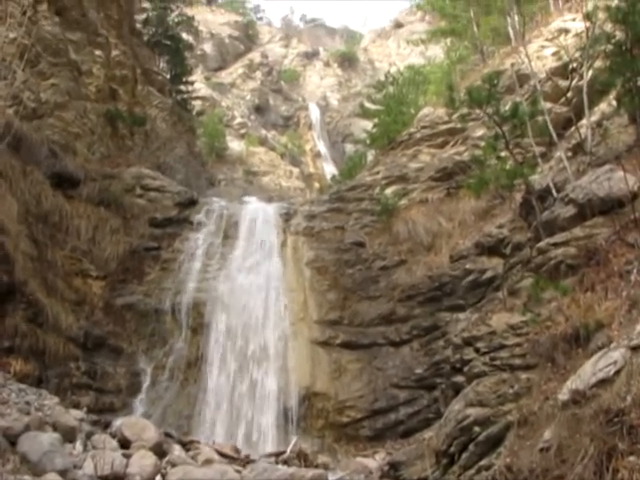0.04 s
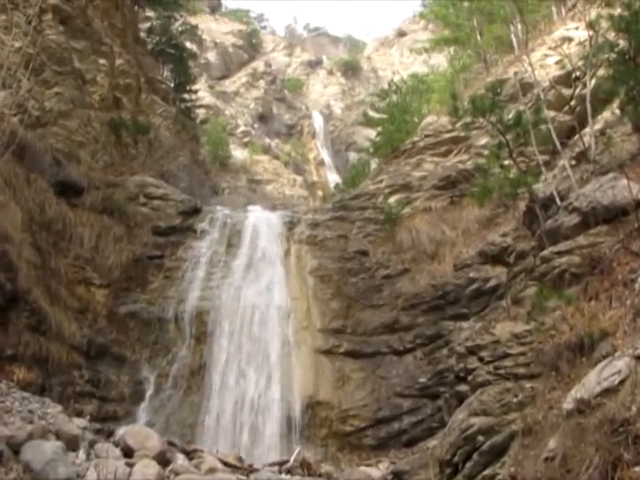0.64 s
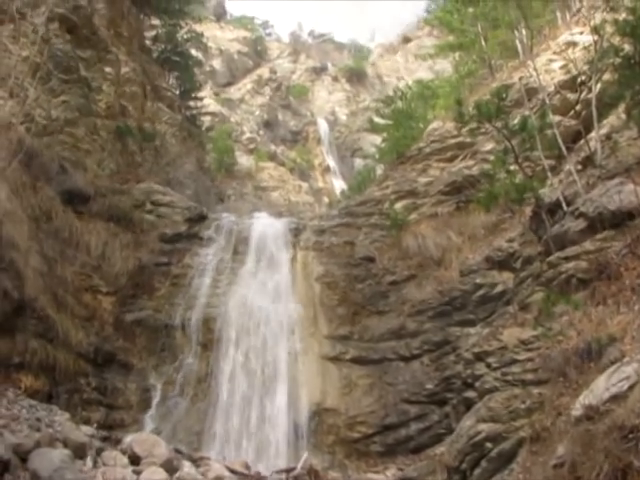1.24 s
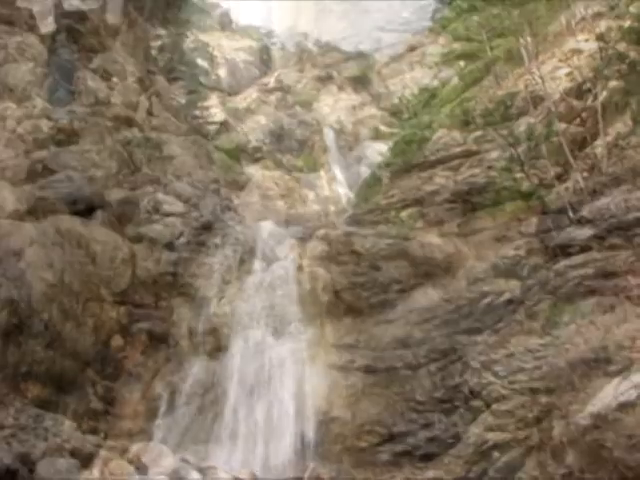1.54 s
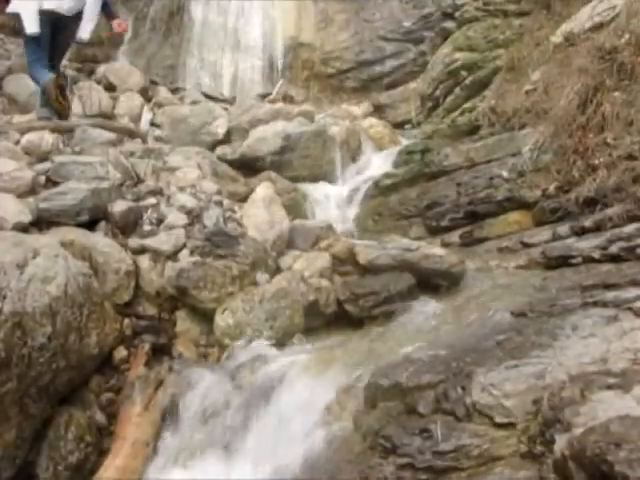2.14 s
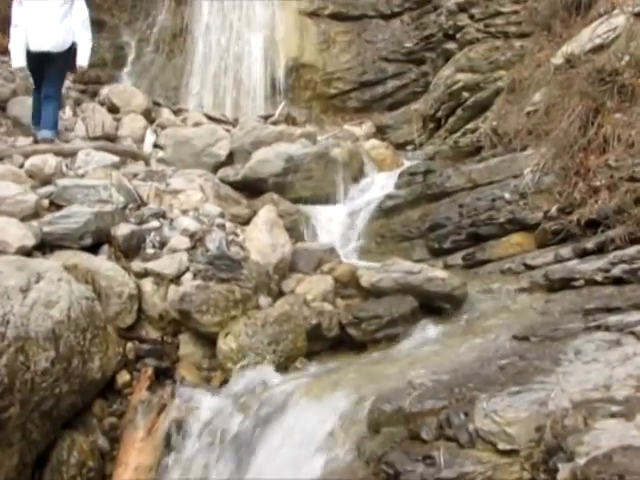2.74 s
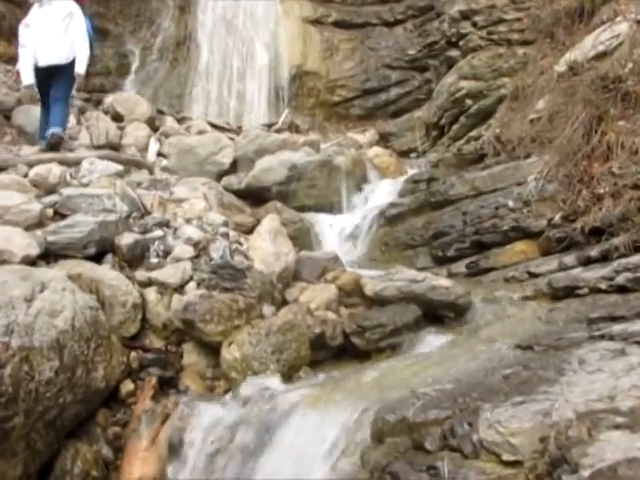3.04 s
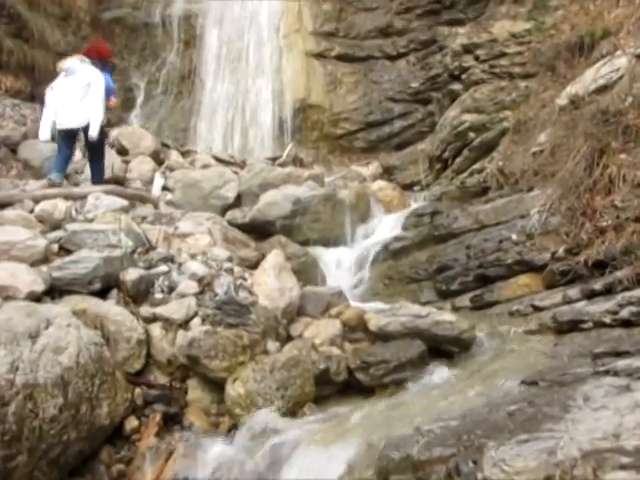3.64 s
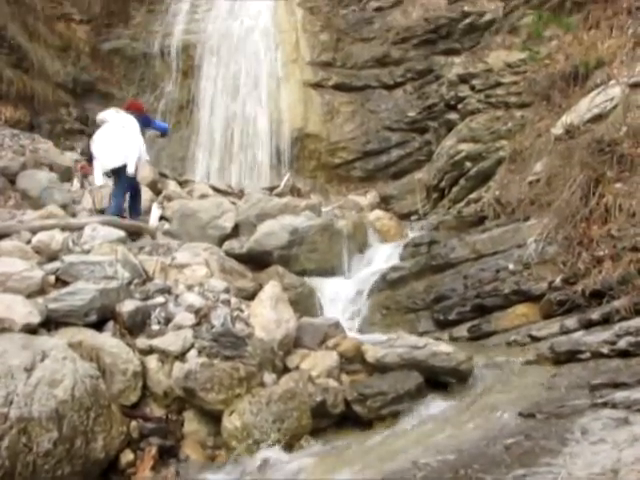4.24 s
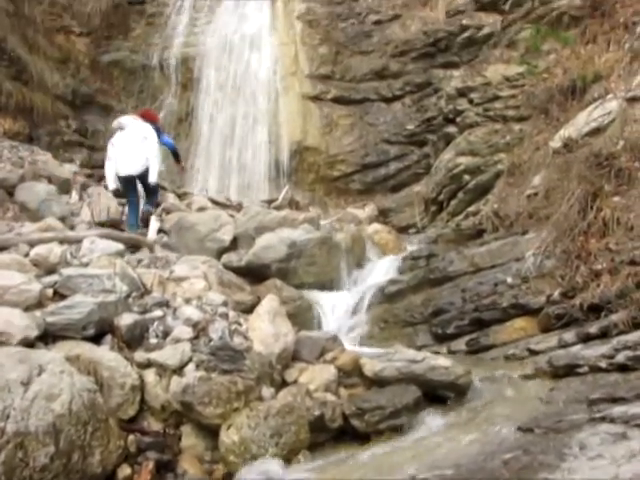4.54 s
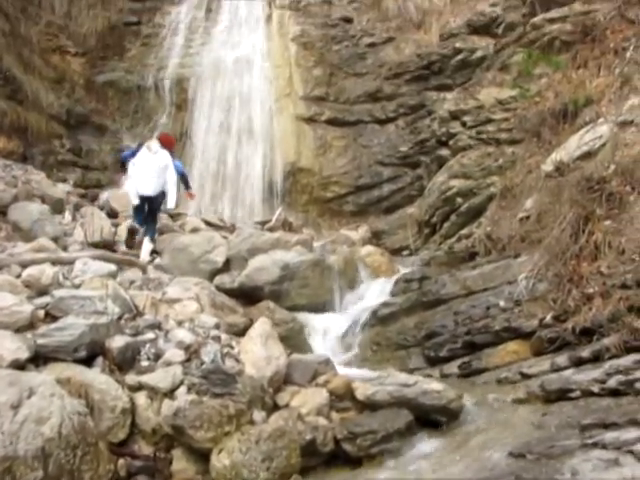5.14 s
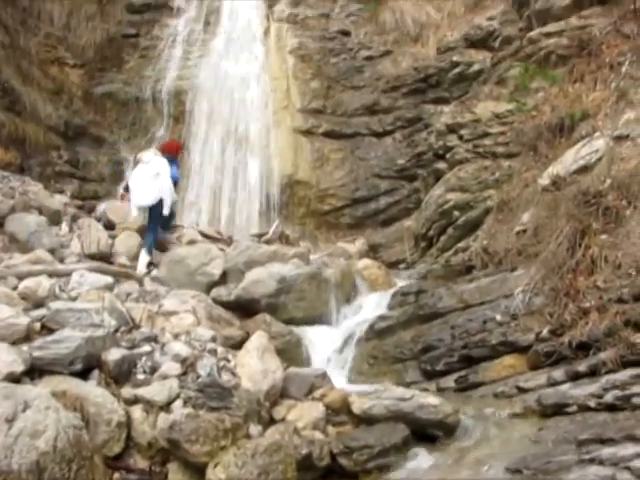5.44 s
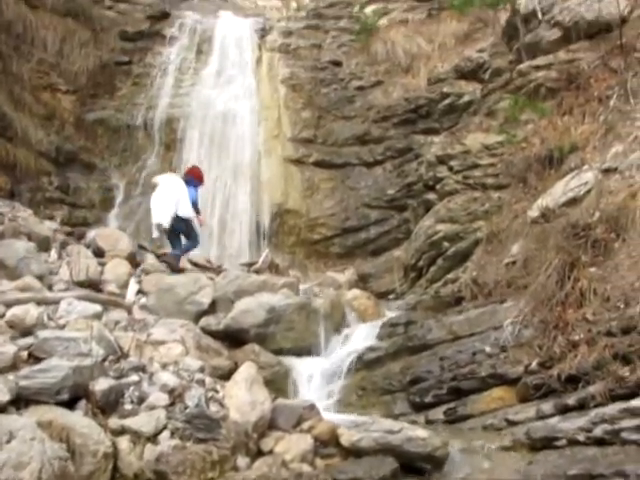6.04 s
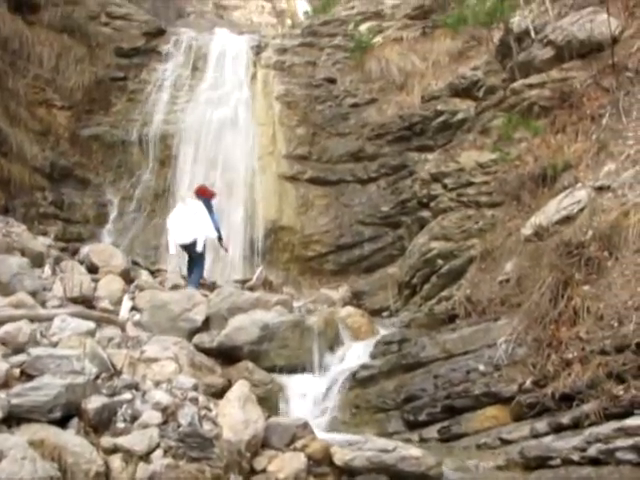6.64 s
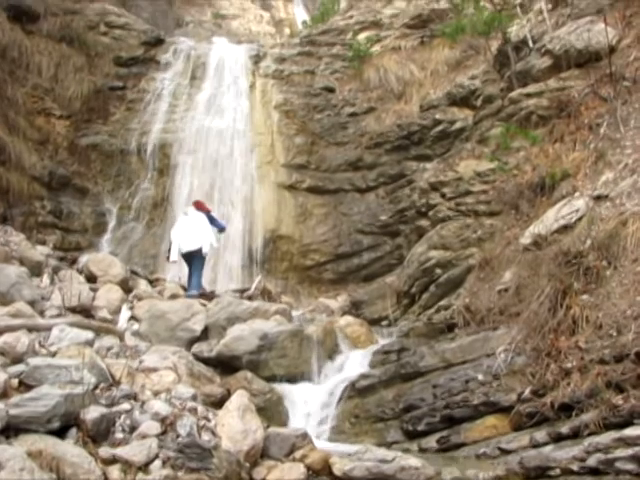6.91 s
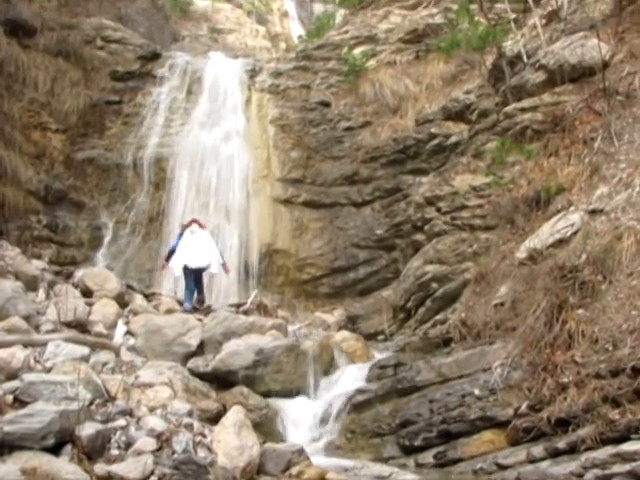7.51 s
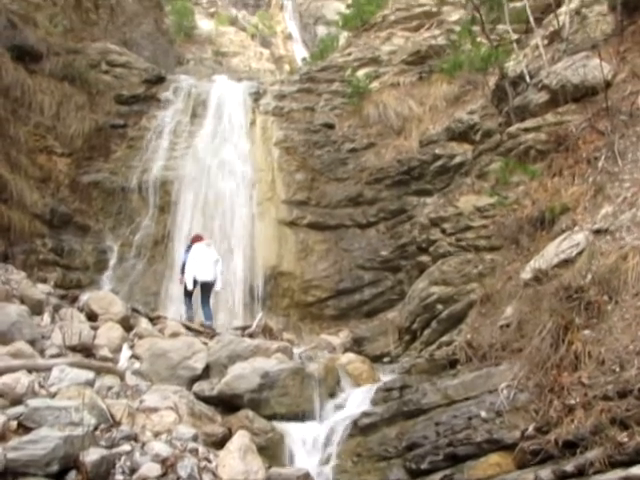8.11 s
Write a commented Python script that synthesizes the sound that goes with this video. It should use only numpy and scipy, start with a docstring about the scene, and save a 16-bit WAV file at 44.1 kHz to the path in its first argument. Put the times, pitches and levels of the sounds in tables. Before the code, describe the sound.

A tall waterfall pours onto rocks in a gorge, a steady, full rush of churning foam and spattering drops. After a second or so the sound blends smoothly into a spot beside the stream below, slightly quieter and more burbling. Gentle gushes swell, faint low blips and small close splashes poke through, and the level dips briefly now and then. The small microphone sounds dull on top.

```python
"""Waterfall in a gorge

A tall fall pours onto rocks. We start facing it, then fade to a spot beside the stream below.
Churning foam roars, countless drops slap the stones and trapped air bubbles ring, all coloured by the
rock walls. Gushes swell, a few low blips and nearby splashes stand out, and now and then the level
dips briefly. The small microphone is dull on top."""
import sys
import numpy as np
from scipy import signal
from scipy.fft import rfft, irfft
from scipy.io import wavfile

SR = 44100
rng = np.random.default_rng(int(sys.argv[2]) if len(sys.argv) > 2 else 0)


def materialize(psi):
    """Save the field psi as 16-bit PCM at rate SR to the path in sys.argv[1].

    A 1-D psi becomes a single channel; in a 2-D psi each row is a channel.
    """
    bounded = np.clip(np.atleast_2d(psi).T, -1, 1)
    quanta = np.round(bounded * 32767).astype(np.int16)
    wavfile.write(sys.argv[1], SR, quanta)


N = 364707
TIME = np.arange(N) / SR
FREQ = np.maximum(np.arange(N // 2 + 1) * SR / N, 1)

# Tone of the water, microphone facing the fall. Each row: frequency in Hz, relative level in dB.
FALL_SPECTRUM = [(15, -39.5), (25, -29), (54, -20), (92, -14.5), (219, -3.5), (311, -1.5), (488, -1.5),
                 (745, -2), (1080, -4), (1500, -6), (2070, -7), (2410, -8.5), (4280, -15.5), (6870, -32),
                 (9750, -62.5), (12700, -100), (21400, -120)]
# Tone of the water, microphone beside the stream. Each row: frequency in Hz, relative level in dB.
STREAM_SPECTRUM = [(15, -40.5), (25, -24.5), (54, -19.5), (143, -8), (289, 0), (430, 0), (526, -0.5),
                   (888, -3), (1290, -5.5), (2180, -9.5), (2730, -9), (3780, -10.5), (5490, -21),
                   (7410, -35), (9750, -61), (12700, -98), (21400, -120)]
# Bands the rock walls lift or cancel, facing the fall. Each row: centre in Hz, width in Hz, lift in dB.
FALL_WALL_BANDS = [(64, 18, 5), (180, 30, 1), (225, 20, 3.5), (248, 22, -3.5), (723, 140, 1.5),
                   (930, 260, -1), (1440, 300, 2.5), (2440, 520, -2.5), (3780, 900, 1.5)]
# The same beside the stream. Each row: centre in Hz, width in Hz, lift in dB.
STREAM_WALL_BANDS = [(64, 11, 8), (98, 16, 1), (193, 43, 3), (250, 47, -2), (313, 44, 0.5), (387, 99, -3),
                     (706, 180, 1), (935, 260, -2), (1320, 680, 2.5), (2150, 210, -1.5), (2580, 980, 2.5),
                     (3700, 700, 0.5)]
# Gushes between the rocks. Each row: peak time in seconds, length in seconds, lift in dB, centre in Hz.
ROCK_GUSHES = [(0.65, 0.17, 1.5, 677), (1.133, 0.08, 1, 850), (1.33, 0.2, 1.1, 900), (2.098, 1, 0.5, 2510),
               (2.095, 0.35, 3, 620), (2.314, 0.074, 2, 620), (3.135, 0.064, 2.5, 900),
               (3.95, 0.07, 1.5, 954), (4.28, 0.089, 0.8, 950), (5.134, 0.22, 2.1, 940),
               (5.43, 0.09, -0.1, 900), (5.783, 0.055, 1.5, 750), (5.964, 0.12, 2.1, 700),
               (6.409, 0.087, 2.5, 700), (6.608, 0.17, 2.5, 800), (7.118, 0.19, 1.3, 680),
               (7.65, 0.33, 1.9, 423), (8.073, 0.16, 2.2, 420)]
# Brief low pitched blips. Each row: start in seconds, relative level in dB, starting pitch in Hz.
LOW_BLIPS = [(0.325, -19, 312), (0.59, -16.5, 742), (0.897, -17, 510), (1.27, -23, 240), (2.598, -21, 590),
             (2.869, -19, 614), (3.511, -15, 790), (5.269, -22.5, 304), (6.39, -21, 544), (6.504, -16, 720),
             (6.769, -17.5, 640), (6.984, -16.5, 650), (7.559, -18, 395)]
# Water slapping a stone near the microphone. Each row: start in seconds, level in dB, centre in Hz.
NEAR_SPLASHES = [(0.597, -32, 3000), (2.435, -40, 4800), (2.739, -32, 4500), (2.966, -38, 4970),
                 (3.099, -34, 5000), (3.284, -28, 2800), (3.423, -37, 4800), (4.633, -29, 2800),
                 (4.826, -38, 4800), (4.888, -28.5, 2800), (5.464, -34, 3800), (5.648, -32, 2800),
                 (5.843, -42, 4800), (7.01, -33, 2800)]
# Brief dips in the whole sound. Each row: start in seconds, depth in dB.
LEVEL_DIPS = [(2.36, 2.5), (2.455, 1.5), (2.62, 1.8), (2.758, 3.6), (3.312, 6), (3.77, 2.3), (3.865, 3),
              (5.495, 2.5), (6.095, 0.8), (6.265, 2.2)]


def foam(flicker_db, flicker_per_s):
    """Churning white water roars: octave bands of turbulence that each flicker on their own."""
    noise, out = rfft(rng.standard_normal(N)), 0
    octave = np.log2(np.clip(FREQ / 80, 1, 128))  # octaves above 80 Hz
    for band in np.arange(np.ceil(octave.max()) + 1):
        share = np.maximum(1 - np.abs(octave - band), 0)
        out = out + irfft(noise * share, N) * undb(flicker_db * wander(flicker_per_s))
    return unit(out)


def drops(per_s, spread_db, clump_db, clumps_per_s):
    """Drops slap the stones as tiny uneven clicks, arriving in clumps as the sheet of water tears."""
    chance = per_s / SR * undb(clump_db * wander(clumps_per_s))
    lands = rng.random(N) < chance
    size = undb(spread_db * rng.uniform(-1.2, 1, N))
    polarity = np.sign(rng.standard_normal(N))
    return unit(lands * size * polarity)


def bubble(hz, cycles, rise):
    """A tone that rings for a few cycles and climbs in pitch, as trapped air does near the surface."""
    decay_s = cycles / hz
    t = np.arange(min(int(5 * decay_s * SR), SR)) / SR
    phase = 2 * np.pi * hz * t * (1 + rise * t / decay_s / 2)
    return np.sin(phase) * np.exp(-t / decay_s)


def bubbles(low_hz, high_hz, cycles, rise, spread_db, count):
    """A crowd of bubbles of all sizes rings in the churned water."""
    out = np.zeros(N)
    for when, pitch, size, life in rng.random((count, 4)):
        hz = low_hz * (high_hz / low_hz) ** pitch
        # small bubbles die sooner and start with a sharper peak
        ring = bubble(hz, cycles * (.5 + life), rise) * hz
        add(out, when * N / SR, ring * undb(spread_db * size))
    return unit(out)


def gushes(water, octaves, lull_db):
    """Each gush swells its own band of the rush; between them the middle sinks back a little."""
    spectrum = rfft(water)
    middle = irfft(spectrum * bell(680, octaves), N)
    out = water + (undb(lull_db) - 1) * middle
    for peak_s, length_s, lift_db, centre_hz in ROCK_GUSHES:
        swell = undb(lift_db * hump(TIME - peak_s, length_s))
        out = out + (swell - 1) * irfft(spectrum * bell(centre_hz, octaves), N)
    return out


def spray(water, centre_hz, octaves, flicker_db, flicker_per_s):
    """Fine spray lands in quick flurries, so the bright edge of the rush flickers."""
    bright_edge = irfft(rfft(water) * bell(centre_hz, octaves), N)
    flurries = unit(undb(flicker_db * wander(flicker_per_s)))
    return water + (flurries - 1) * bright_edge


def low_blips(cycles, rise, gain_db):
    """Brief low pitched blips that stand out of the rush."""
    out = np.zeros(N)
    for start_s, db, hz in LOW_BLIPS:
        add(out, start_s, undb(db + gain_db) * bubble(hz, cycles, rise))
    return out


def splashes(rise_s, octaves):
    """Water slaps stones near the microphone: short bursts of drops, each with its own brightness."""
    patter = drops(per_s=5300, spread_db=-1.5, clump_db=3.0, clumps_per_s=39)
    spectrum = rfft(gorge(patter, STREAM_SPECTRUM, STREAM_WALL_BANDS))
    out = 0
    for start_s, db, centre_hz in NEAR_SPLASHES:
        age = np.maximum(TIME - start_s, 0) / rise_s
        burst = unit(irfft(spectrum * bell(centre_hz, octaves), N))
        out = out + undb(db) * age * np.exp(1 - age) * burst
    return out


def gorge(water, spectrum, wall_bands):
    """The tone at one microphone position, with narrow peaks and notches from rock walls and hollows."""
    hz, db = np.transpose(spectrum)
    shape_db = np.interp(np.log(FREQ), np.log(hz), db)
    for centre_hz, width_hz, lift_db in wall_bands:
        shape_db = shape_db + lift_db * hump(FREQ - centre_hz, width_hz)
    return unit(irfft(rfft(water) * undb(shape_db), N))


def dips(drop_s, recover_s):
    """The level dips briefly: a gain that drops quickly and climbs back smoothly."""
    db = 0
    for start_s, depth_db in LEVEL_DIPS:
        age = np.maximum(TIME - start_s, 0)
        db = db - depth_db * np.minimum(age / drop_s, 1) * np.exp(-(age / recover_s) ** 2)
    return undb(db - db.mean())


def wander(per_s):
    """A smooth random curve with an rms of one that changes about `per_s` times a second."""
    slow = irfft(rfft(rng.standard_normal(N)) / (1 + (FREQ / per_s) ** 2), N)
    return unit(slow - slow.mean())


def bell(centre_hz, octaves):
    """A band filter that falls to 1/e at `octaves` either side of its centre."""
    return np.exp(-(np.log2(FREQ / centre_hz) / octaves) ** 2)


def hump(offset, width):
    """A smooth peak of height one, `width` across at half height."""
    return 2 ** -((2 * offset / width) ** 2)


def add(out, start_s, sound):
    """Mix a short sound in at its time."""
    start = int(start_s * SR)
    out[start:start + len(sound)] += sound[:N - start]


def undb(db):
    """Decibels to gain."""
    return 10 ** (np.asarray(db) / 20)


def unit(x):
    """Scale to an rms of one."""
    return x / np.sqrt(np.mean(x ** 2))


def scene():
    """The water in mono, first facing the fall, then from beside the stream."""
    roar = foam(flicker_db=0.64, flicker_per_s=14)
    spatter = undb(-4.5) * drops(per_s=1800, spread_db=5.5, clump_db=0.66, clumps_per_s=25)
    gurgle = bubbles(low_hz=252.2, high_hz=5600, cycles=3.9, rise=0.021, spread_db=5.5, count=6000)
    water = gushes(roar + spatter + undb(-14.5) * gurgle, octaves=1.3, lull_db=-0.07)
    water = water * undb(0.31 * wander(per_s=19))  # the whole flow flutters
    at_fall = undb(-24) * gorge(water, FALL_SPECTRUM, FALL_WALL_BANDS)

    burble = bubbles(low_hz=482, high_hz=1391, cycles=5, rise=0.04, spread_db=11, count=450)
    stream = water + undb(-20.5) * burble
    stream = spray(stream, centre_hz=5400, octaves=0.6, flicker_db=1.03, flicker_per_s=54)
    at_stream = undb(-25.5) * gorge(stream, STREAM_SPECTRUM, STREAM_WALL_BANDS)

    fade_start_s, fade_end_s = 1.3, 2.1
    fade = np.clip((TIME - fade_start_s) / (fade_end_s - fade_start_s), 0, 1)
    rush = (1 - fade) * at_fall + fade * at_stream
    sound = rush + low_blips(cycles=5.0, rise=0.024, gain_db=-2.0) + splashes(rise_s=0.0052, octaves=1)
    return (sound * dips(drop_s=0.0022, recover_s=0.041))[None]


def record(dry):
    """The recorder cuts off the top steeply."""
    top_hz = 10400
    return signal.sosfilt(signal.ellip(8, .2, 70, top_hz, fs=SR, output="sos"), dry)


dry = scene()
out = record(dry)
materialize(out)
```